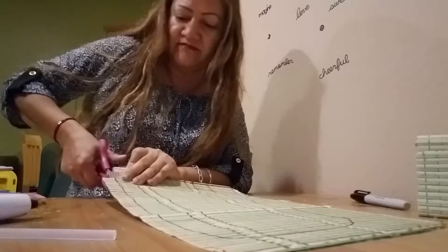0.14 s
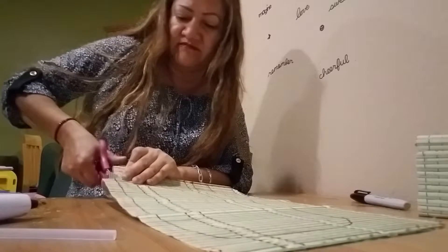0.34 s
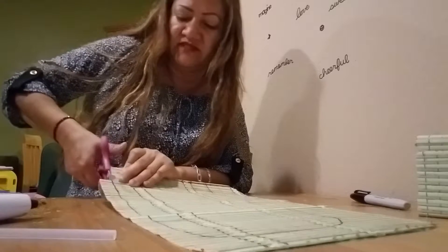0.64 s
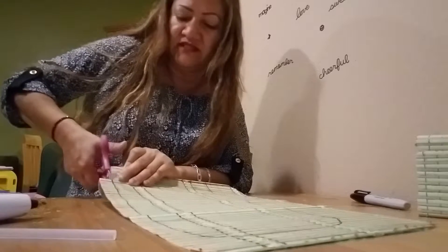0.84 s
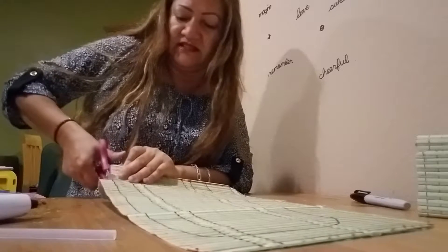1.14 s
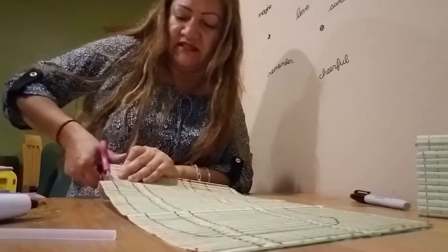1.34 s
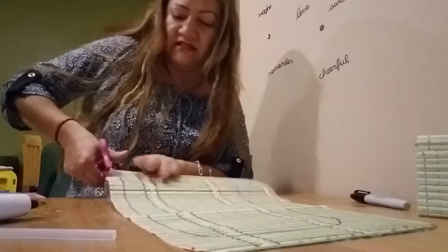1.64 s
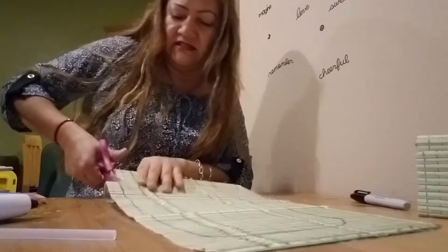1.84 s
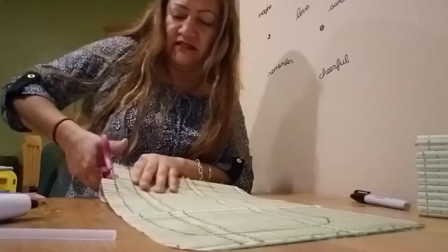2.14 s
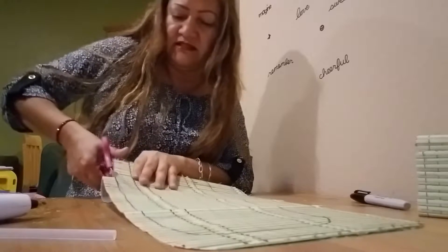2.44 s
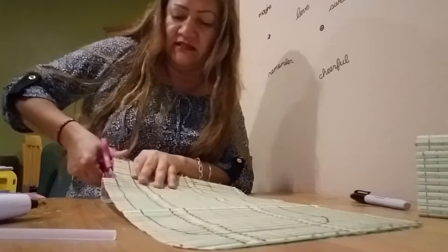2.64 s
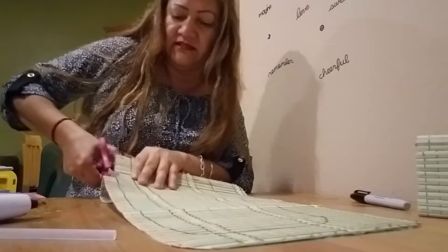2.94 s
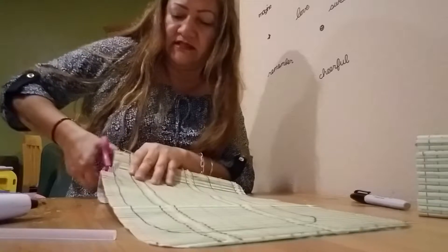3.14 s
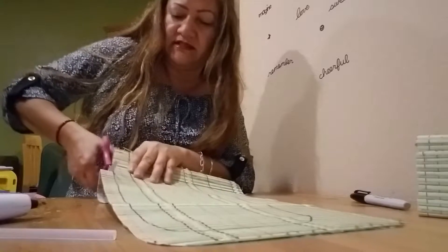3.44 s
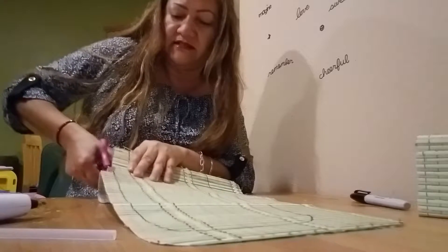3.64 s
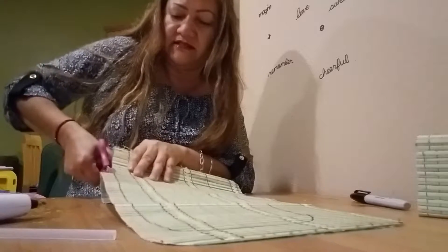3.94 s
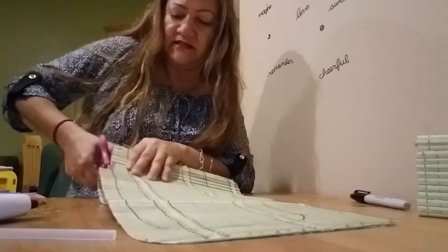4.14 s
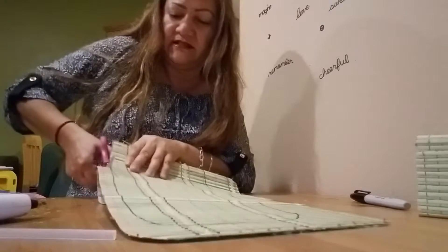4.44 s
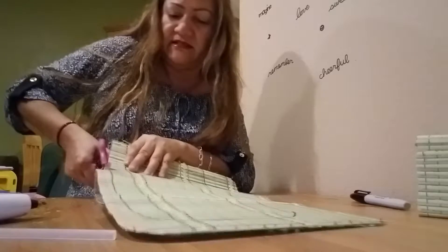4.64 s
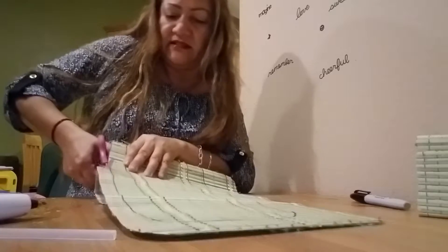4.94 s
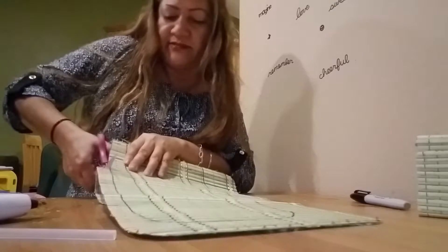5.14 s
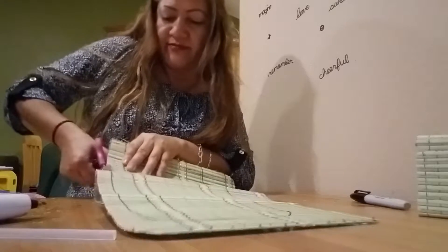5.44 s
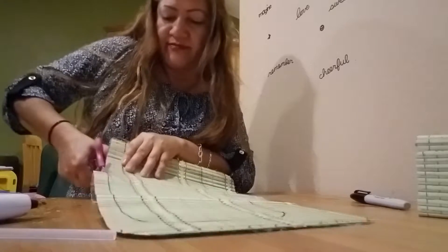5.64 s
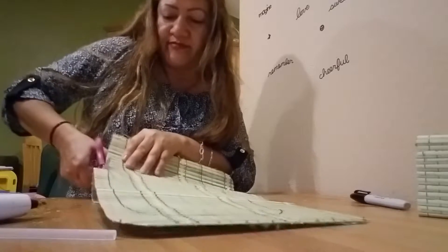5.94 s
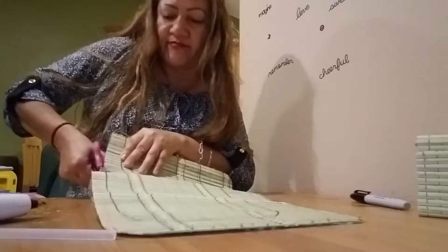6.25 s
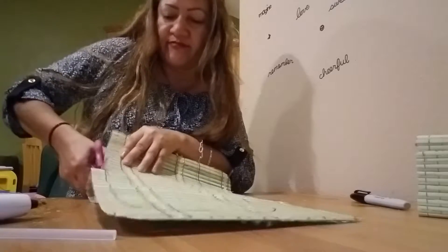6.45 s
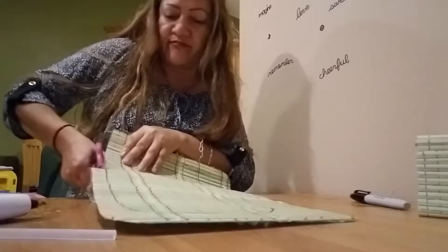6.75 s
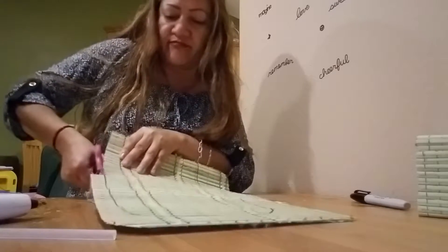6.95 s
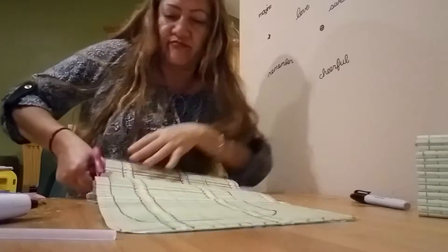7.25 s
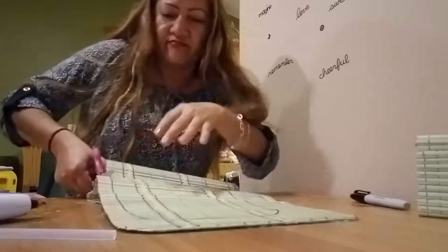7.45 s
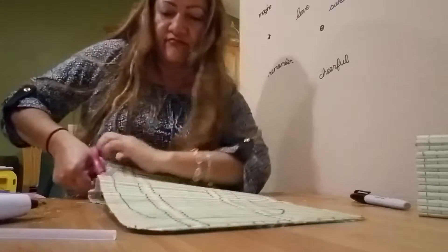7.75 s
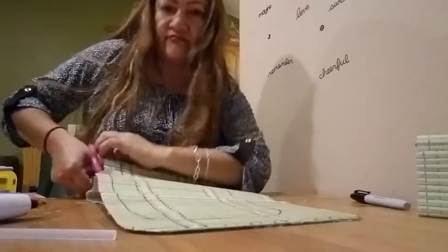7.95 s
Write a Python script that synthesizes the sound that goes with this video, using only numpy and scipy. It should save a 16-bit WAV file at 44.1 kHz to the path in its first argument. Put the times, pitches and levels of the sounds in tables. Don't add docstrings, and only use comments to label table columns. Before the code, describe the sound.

A small, quiet room with a faint low appliance hum, heard close in stereo. A mat hisses softly under a hand; a light blade bite at 0.1 s leads to a crisp splintering snip at 0.25. Rustle and a short scrape follow around 0.6-0.8, then a close pair of snips at 1.1 and another at 1.35. From 1.5 to 2.2 the mat's edge drags roughly over the wooden table. Snips cluster at 2.4-2.65, then 3.45, 3.65 and a sharp one at 3.83. A strong cut with a low table thump lands near 4.6, with rustling around it. Close cuts come at 5.3, a brief scrape at 5.65, more cuts at 6.0 and 6.15, and a rapid flurry at 6.7-6.9. Each crack gets a quick wall slap and short room ring. Rustling fades; light dry finger taps tick around 7.7-8.0.

```python
import sys
import numpy as np
from scipy import signal
from scipy.fft import rfft, irfft
from scipy.io import wavfile
from scipy.ndimage import uniform_filter1d

SR = 44100
rng = np.random.default_rng(int(sys.argv[2]) if len(sys.argv) > 2 else 0)


def nominal_scale(level):
    x = np.asarray(level, float) / 20
    return 10 ** x


def bounce(signal):
    frames = np.transpose(np.atleast_2d(signal))
    limited = np.clip(frames, -1, 1)
    pcm = np.round(limited * 32767).astype(np.int16)
    wavfile.write(sys.argv[1], SR, pcm)


N = 356416

# pitch_hz, level_db (per Hz)
AIR_COLOUR = [(15, -38), (25, -34), (43, 1), (100, -8), (177, 2.5), (226, -6.5), (410, -2.5), (483, -8),
              (634, -11), (726, -13.5), (5130, -31.5), (7710, -53), (9330, -40.5), (15200, -26),
              (16500, -62)]
# pitch_hz, width_hz, level_db
HUM_MODES = [(176.6, 36, -64), (261, 7, -70.5), (340.8, 26, -70.5), (413.4, 6, -69), (73.5, 8, -76)]
# pitch_hz, level_db, t60_s
TABLE_MODES = [(57.5, -2, 0.54), (122, 11.5, 0.36), (349, -6, 0.39)]
# start_s, peak_db
THUMPS = [(0.254, -48.5), (1.093, -49), (1.124, -51), (1.351, -49), (2.442, -48), (2.508, -49),
          (2.645, -61), (3.462, -57), (3.641, -40.5), (3.832, -47.5), (4.599, -37), (5.201, -54),
          (5.313, -45), (5.358, -41.5), (6.025, -41), (6.144, -39), (6.728, -50), (6.745, -40.5),
          (6.804, -44), (6.864, -43)]
# pitch_hz, level_db (per Hz)
RUB_COLOUR = [(300, -6), (700, 7), (1400, 3), (2500, -5.5), (4500, -24.5)]
# pitch_hz, level_db (per Hz)
HISS_COLOUR = [(1180, -22), (2000, -1), (3110, -5.5), (4160, -3.5), (4590, -7), (7650, -7), (9460, -17),
               (15100, -9), (16100, -3), (16500, -35)]
# peak_s, swell_s, rub_db, hiss_db
SLIDES = [(0.03, 0.42, -93, -68), (0.43, 0.12, -69, -80), (0.639, 0.049, -56.5, -55),
          (0.71, 0.049, -58.5, -67), (0.99, 0.035, -75, -82), (1.1, 0.086, -61, -64), (1.62, 0.2, -58, -70),
          (1.82, 0.07, -63.5, -75), (1.94, 0.092, -62, -64.5), (2.11, 0.066, -64, -72),
          (2.2, 0.076, -61.5, -100), (2.499, 0.14, -55, -48), (2.99, 0.074, -64, -62),
          (3.07, 0.09, -61, -59), (3.24, 0.044, -74, -80), (3.44, 0.03, -59, -64), (3.78, 0.39, -66.5, -63),
          (4.09, 0.087, -62.5, -60), (4.47, 0.071, -60, -54), (4.66, 0.15, -59, -52.5),
          (4.83, 0.41, -71, -76), (4.961, 0.08, -71, -61.5), (5.31, 0.084, -55.5, -54.5),
          (5.64, 0.044, -58.5, -58), (6.031, 0.06, -53, -53), (6.389, 0.11, -53.5, -55.5),
          (6.6, 0.3, -66.5, -74.5), (7.121, 0.085, -58, -62), (7.22, 0.093, -68.5, -68.5),
          (7.76, 0.05, -60, -58), (7.869, 0.064, -61.5, -62)]
# pitch_hz, width_hz, level_db
DRAG_MODES = [(840, 50, 5), (1100, 64, -2), (1420, 110, 3), (1900, 63, 7), (2075, 33, 8.5),
              (2560, 110, -10)]
# peak_s, build_s, let_go_s, level_db
DRAGS = [(0.634, 0.054, 0.17, -59.5), (0.748, 0.0054, 0.023, -56), (0.822, .014, 0.069, -63),
         (1.632, 0.17, 0.11, -56.5), (1.74, 0.042, 0.032, -53), (1.85, 0.024, 0.025, -54.5),
         (1.96, 0.06, 0.05, -60), (2.03, 0.06, 0.018, -57), (2.064, 0.0091, 0.024, -54),
         (2.21, 0.16, 0.021, -63), (5.656, 0.056, 0.0078, -57), (5.662, .005, 0.086, -70)]
# start_s, splinter_crack_db, mat_knock_db, blade_snap_db, free_slat_hz
CUTS = [(0.2535, -17, -29, -34.5, 1386), (0.2594, -48, -37, -30, 1345), (1.0942, -28.5, -37, -32, 1200),
        (1.125, -25, -34, -39, 1310), (1.3524, -15, -27, -27.5, 1240), (2.441, -22, -29.5, -36.5, 1315),
        (2.4785, -39.5, -35.5, -46, 1380), (2.508, -31, -35.5, -38, 1320),
        (2.6483, -21.5, -27.5, -29.5, 1260), (3.462, -28.5, -32.5, -38.5, 1390),
        (3.6433, -18, -26, -27, 1600), (3.8325, -12, -29, -32.5, 1016), (4.5627, -25.5, -35, -40, 570),
        (4.5891, -15, -28.5, -29.5, 1275), (5.3109, -21.5, -30, -30.5, 850), (5.3536, -22, -36, -37, 1650),
        (5.3564, -20.5, -32.5, -35.5, 1100), (6.0229, -21, -29, -34.5, 835),
        (6.1455, -14, -27.5, -44, 2000), (6.148, -17, -31.5, -26.5, 2630), (6.7279, -22, -31, -35.5, 1540),
        (6.7476, -24, -35, -41, 950), (6.763, -30, -40, -42, 850), (6.804, -16.5, -32.5, -33, 940),
        (6.865, -21.5, -32.5, -28, 1640)]
# start_s, splinter_crack_db,
# mat_knock_db, blade_snap_db, slat_hz
BITES = [(0.0742, -34, -52.5, -37.5, 3940), (0.747, -52, -40, -54, 580), (1.077, -44, -55, -59, 555),
         (1.2994, -35, -50.5, -40.5, 2130), (2.36, -30.5, -49, -43.5, 1920),
         (2.4016, -24, -49, -38.5, 1420), (2.598, -33.5, -44.5, -36.5, 1560),
         (2.955, -45.5, -48, -46.5, 1340), (3.4288, -43, -49, -48.5, 1440),
         (3.4477, -32, -46.5, -57.5, 1800), (3.64, -25, -50, -36, 1220), (4.3992, -34.5, -45, -50, 1450),
         (4.442, -35, -52, -51, 1350), (5.199, -28.5, -39, -41, 830), (5.2661, -26.5, -47.5, -47, 1440),
         (5.982, -40, -39.5, -42, 1640), (6.1214, -37, -41.5, -61, 1300), (6.3717, -41.5, -49, -48, 1130),
         (6.639, -44, -50, -46.5, 1650), (6.718, -39, -58, -48, 1380), (7.705, -41, -60, -46, 1990),
         (7.712, -40, -46, -48.5, 2050), (7.7386, -64, -64, -48, 2500), (7.7496, -42, -50, -45.5, 1900)]
# start_s,
# splinter_crack_db, body_db, slat_hz
TICKS = [(0.191, -45.5, -59, 560), (0.205, -49, -71, 743), (0.407, -37.5, -55, 549),
         (0.5832, -44.5, -63, 716), (0.911, -63, -75, 5000), (0.947, -57, -72, 900),
         (0.986, -54, -68, 3500), (0.999, -70, -62, 2200), (1.065, -41, -61, 1500),
         (1.0845, -42, -56.5, 1510), (1.0889, -24, -43, 1450), (2.3188, -58, -64, 1490),
         (2.425, -42, -52, 2500), (2.635, -37, -54, 1500), (3.4335, -45, -58, 1500),
         (3.4566, -40, -45, 1400), (4.396, -48, -62, 2000), (5.236, -39, -63, 1500), (5.346, -30, -46, 990),
         (6.0156, -41, -45.5, 1490), (6.7004, -49, -60, 1500), (7.0323, -54, -71, 1500),
         (7.1125, -65, -59, 1500), (7.667, -64, -78, 4500), (0.9578, -47, -67, 970), (1.019, -51, -71, 501),
         (1.0621, -41, -52, 830), (1.8343, -60, -60, 1440), (2.0233, -61, -57, 2050),
         (2.063, -71, -52, 1870), (2.3484, -44, -60, 534), (2.828, -46, -63, 525), (3.2248, -59, -75, 7500),
         (3.249, -60, -73, 7100), (3.3815, -38, -52.5, 536), (3.5884, -56, -68, 501),
         (3.596, -47, -55, 1720), (4.4669, -40, -51.5, 1530), (4.4932, -35, -57, 880),
         (5.113, -48, -66, 501), (5.1245, -40.5, -62, 700), (5.6505, -51, -51, 1800),
         (5.9723, -45.5, -60, 494), (6.7084, -33, -53.5, 781), (7.0817, -54, -72, 692),
         (7.436, -48, -82, 7500), (7.774, -56, -62, 4000), (7.791, -49, -50.5, 3020),
         (7.9885, -53.5, -62.5, 7650), (8.0432, -77, -59, 970)]
# pitch_ratio, level_db
SLAT_OVERTONES = [(0.68, -6), (1.0, 1.5), (1.47, -4)]
# pitch_hz, level_db (per Hz)
SNAP_COLOUR = [(120, -21), (200, -9.5), (500, -2.5), (700, 1.5), (1330, 2.5), (2300, 1.5), (3200, -1.5),
               (5200, 2), (7000, 1.5), (8200, 2), (9300, -12.5), (11000, -10), (14500, 1.5), (17000, -6.5)]
# pitch_hz, level_db
TAIL_COLOUR = [(300, 4), (1000, -0.5), (2200, 0.3), (3800, -2.5), (5400, -3), (7600, 1), (11000, 5),
               (15000, -1)]
# pitch_hz, t60_s
ROOM_T60 = [(200, 0.4), (600, 0.25), (1500, 0.29), (4000, 0.32), (8000, 0.31), (14000, 0.23)]
# pitch_hz, likeness (0 to 1)
LIKENESS = [(40, 0.45), (120, 0.87), (300, 0.84), (640, .5), (1400, 0.027), (16000, 0.037)]
# pitch_hz, left_minus_right_db
PORTS = [(60, 3), (400, 3), (1200, 0), (2300, 2), (4500, 3), (7500, -2.5), (12000, 2)]

BAND_EDGES_HZ = 200 * 2 ** np.arange(0, 6.6, .5)
STEP = 16
BREAK_LENGTH = 1600
ARM_UP_S = 7.6
LEFT_LAG = 5


def at_hz(points, hz):
    table_hz, value = np.array(points)[:, :2].T
    return np.interp(np.log(hz + 1e-9), np.log(table_hz), value)


def rms_one(x):
    return x / np.sqrt(np.mean(x ** 2) + 1e-20)


def band(x, low, high):
    return signal.sosfilt(signal.butter(2, [low, high], "band", fs=SR, output="sos"), x)


def colour(x, spectrum, size=8192):
    cepstrum = irfft(np.log(nominal_scale(at_hz(spectrum, np.arange(size // 2 + 1) * SR / size))))
    cepstrum[1:size // 2] *= 2
    cepstrum[size // 2 + 1:] = 0
    kernel = irfft(np.exp(rfft(cepstrum)))
    return signal.fftconvolve(np.atleast_2d(x), kernel[None], axes=1)[:, :N]


def wander(rate):
    knots = rng.standard_normal(13000)
    return np.interp(np.arange(N) / SR * rate, np.arange(len(knots)), knots)


def spread_stereo(mid, side, alike):
    alike = np.clip(alike, 0, 1)
    return np.sqrt(1 + alike) * mid + np.sqrt(1 - alike) * side * [[1], [-1]]


def diffuse(spectrum):
    mid, side = rfft(rng.standard_normal((2, N)))
    alike = at_hz(LIKENESS, np.arange(len(mid)) * SR / N)
    return rms_one(colour(irfft(spread_stereo(mid, side, alike), N), spectrum))


def resonate(x, hz, width_hz):
    r = np.exp(-np.pi * width_hz / SR)
    feedback = [1, -2 * r * np.cos(2 * np.pi * hz / SR), r * r]
    return signal.lfilter([(1 - r * r) / 2, 0, (r * r - 1) / 2], feedback, x)


def strikes(rows, level_db, size=1):
    out = np.zeros(N // size + 1)
    np.add.at(out, (np.array(rows)[:, 0] * SR / size).astype(int), nominal_scale(level_db))
    return out


def air():
    white = rng.standard_normal(N) + 0.075 * rng.standard_normal((2, N))
    hum = 0
    for hz, width_hz, level_db in HUM_MODES:
        ringing = resonate(resonate(white, hz, width_hz), hz, width_hz)
        hum = hum + nominal_scale(level_db) * rms_one(ringing)
    return nominal_scale(-59) * diffuse(AIR_COLOUR) + hum


def table():
    clicks = strikes(THUMPS, np.array(THUMPS)[:, 1] - 8)[:N]
    push = signal.lfilter([.01], [1, -.99], clicks + 1e-18)
    out = 0
    for hz, level_db, t60 in TABLE_MODES:
        r, w = nominal_scale(-60 / (t60 * SR)), 2 * np.pi * hz / SR
        out = out + signal.lfilter([0, nominal_scale(level_db) * np.sin(w)], [1, -2 * r * np.cos(w), r * r], push)
    return out


def rustle():
    peak_s, swell_s, rub_db, hiss_db = np.transpose(SLIDES)[:, :, None]
    t = np.arange(N // STEP + 1) * STEP / SR
    away = np.maximum(peak_s - t, (t - peak_s) / 0.79) / swell_s
    below_db = -18 * away ** 1.6

    def slide_gain(level_db, rest_db):
        return (nominal_scale(level_db + below_db).sum(axis=0) + nominal_scale(rest_db)).repeat(STEP)[:N]

    rub = diffuse(RUB_COLOUR) * slide_gain(rub_db, -70.5)
    rub = rub * nominal_scale(2.0 * wander(40) + 1.5 * wander(250))
    hiss = diffuse(HISS_COLOUR) * slide_gain(hiss_db, -76)
    hiss = hiss * nominal_scale(2.2 * wander(84) + 1.86 * wander(650))
    return rub + hiss


def drag():
    t = np.arange(N) / SR
    gain = 0
    for s, build_s, go_s, level_db in DRAGS:
        gain = gain + np.interp(t, [s - build_s, s, s + go_s], [0, nominal_scale(level_db), 0])
    grains = band(rng.standard_normal((2, N)), 500, 2800) * nominal_scale(3.0 * wander(140))
    ringing = sum(nominal_scale(db) * resonate(grains, hz, width_hz) for hz, width_hz, db in DRAG_MODES)
    return nominal_scale(1.0) * gain * rms_one(ringing)


def breaks():
    cuts, bites = np.array(CUTS), np.array(BITES)
    s, crack_db, body_db, hz = np.transpose(TICKS)
    cut_fizz_db = 0.53 * cuts[:, 1] + 0.47 * cuts[:, 2] - 9.5
    bite_fizz_db = bites[:, 1] - 15
    tick_fizz_db = crack_db - 10 - 9 * (hz > 5000)
    ticks = np.column_stack([s, crack_db, body_db + 0.5, body_db - 1.5, hz, tick_fizz_db])
    rows = np.vstack([np.column_stack([cuts, cut_fizz_db]), np.column_stack([bites, bite_fizz_db]), ticks])
    return rows[np.argsort(rows[:, 0])]


def band_levels(rows, hz):
    _, crack_db, knock_db, snap_db, slat_hz, fizz_db = rows.T
    centres = np.log([800, 2800, 6500, 12500])
    knock, snap, crack, fizz = [np.interp(np.log(hz), centres, unit) for unit in np.eye(4)]
    hump_db = 2.56 * np.exp(-(np.log2(hz / slat_hz) / 0.17) ** 2)
    body = knock * (knock_db + 11.5) + snap * (snap_db + 12.0)
    return body + crack * (crack_db - 0.5) + fizz * (fizz_db + 14.5) + hump_db


def splintering(rows):
    t = np.arange(BREAK_LENGTH) / SR
    roughness_db = 2.43 * rng.standard_normal((len(rows), 1, 40)).repeat(40, axis=2)
    splinters = rng.standard_normal((len(rows), 2, len(t))) * nominal_scale(roughness_db)
    tearing_s = np.interp(np.maximum(rows[:, 2:3], rows[:, 3:4]), [-50, -30], [.0013, .0027])
    let_go = (tearing_s[:, 0] * 0.7 * SR).astype(int)
    splinters[np.arange(len(rows)), :, let_go] = np.where(rows[:, :1] > ARM_UP_S, 60, 26)
    bursts = 0
    for k, (low, high) in enumerate(zip(BAND_EDGES_HZ, BAND_EDGES_HZ[1:])):
        hz = np.sqrt(low * high)
        rise = 1 - np.exp(-t / .0006)
        fall = np.exp(-.5 * (t / (1.7 * tearing_s + 0.33 / hz)) ** 2)
        burst = band(rise * fall * splinters[:, k % 2], low, high)
        burst /= np.sqrt(np.sum(burst ** 2, axis=1, keepdims=True) / (high - low))
        bursts = bursts + nominal_scale(band_levels(rows, hz) - 18.5)[:, None] * burst
    return bursts


def free_slat(rows):
    t = np.arange(BREAK_LENGTH) / SR
    partials = sum(nominal_scale(db) * np.sin(2 * np.pi * ratio * rows[:, 4:5] * t) for ratio, db in SLAT_OVERTONES)
    level_db = np.maximum(rows[:, 2:3], rows[:, 3:4]) + 3.0 - 12 * (rows[:, :1] > ARM_UP_S)
    return nominal_scale(level_db) * partials * (1 - np.exp(-t / 0.00083)) * nominal_scale(-60 * t / 0.017)


def room_tail(rows):
    white = rng.standard_normal((2, 2, N))
    spread_db = np.interp(np.maximum(rows[:, 2], rows[:, 3]), [-48, -32], [-6.0, 0.1])
    spread_db = spread_db - 2 * (rows[:, 0] > ARM_UP_S)
    build = np.exp(-STEP / (.004 * SR))
    tail = 0
    for k, (low, high) in enumerate(zip(BAND_EDGES_HZ, BAND_EDGES_HZ[1:])):
        hz = np.sqrt(low * high)
        level_db = band_levels(rows, hz) + spread_db + at_hz(TAIL_COLOUR, hz)
        power = strikes(rows + .008, level_db, size=STEP) ** 2 + 1e-18
        keep = nominal_scale(-120 * STEP / (at_hz(ROOM_T60, hz) * SR))
        fading = signal.lfilter([1], [1, -keep], power)
        energy = signal.lfilter([1 - build], [1, -build], fading)
        patches = nominal_scale(2.0 * rng.standard_normal(len(energy) // 48 + 1).repeat(48)[:len(energy)])
        gain = (np.sqrt(energy) * uniform_filter1d(patches, size=48)).repeat(STEP)[:N]
        mid, side = band(white[k % 2], low, high)
        tail = tail + gain * spread_stereo(mid, side, at_hz(LIKENESS, hz))
    flutter = nominal_scale(2.03 * wander(400) + 1.16 * wander(70))
    return flutter * tail


def at_ports(direct):
    left = .5 * (np.roll(direct, LEFT_LAG) + np.roll(direct, LEFT_LAG - 1))
    left = left + 0.21 * np.roll(direct, 3 * LEFT_LAG)
    arm_up = int(ARM_UP_S * SR)
    left[arm_up:] = np.roll(direct, 1)[arm_up:]
    return np.array([left, direct])[:, :N]


def near_wall(direct):
    wall = np.array([np.roll(direct, round(s * SR)) for s in (.0116, .0121)])[:, :N]
    return wall * np.where(np.arange(N) < ARM_UP_S * SR, 1, .3)


def snaps():
    rows = breaks()
    direct = np.zeros(N + BREAK_LENGTH)
    at = (rows[:, :1] * SR).astype(int) + np.arange(BREAK_LENGTH)
    np.add.at(direct, at, splintering(rows) + free_slat(rows))
    echoes = nominal_scale(-9.5) * near_wall(direct) + nominal_scale(-16) * room_tail(rows)
    return colour(at_ports(direct) + echoes, SNAP_COLOUR)


def scene():
    return air() + table() + rustle() + drag() + snaps()


def band_limit(x):
    return signal.sosfilt(signal.butter(12, 16980, fs=SR, output="sos"), x)


def record(dry):
    ports = []
    for k, side in enumerate([1, -1]):
        tilt = [(hz, side * db / 2) for hz, db in PORTS]
        ports.append(colour(dry[k], tilt)[0])
    ports = signal.sosfilt(signal.butter(4, 44, "high", fs=SR, output="sos"), np.array(ports))
    mix = signal.sosfilt(signal.ellip(8, .5, 40, 15750, fs=SR, output="sos"), ports)
    return band_limit(mix)


dry = scene()
out = record(dry)
bounce(out)
```